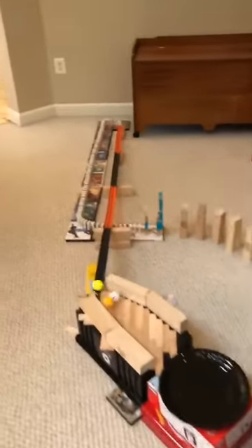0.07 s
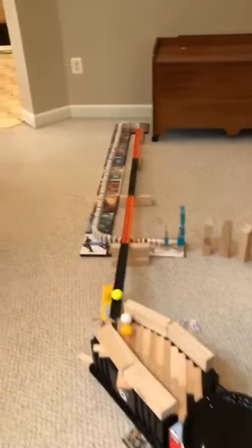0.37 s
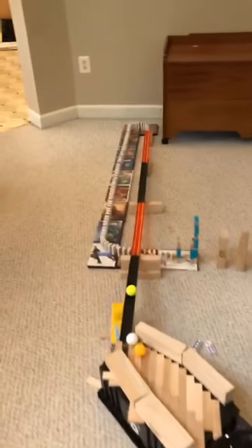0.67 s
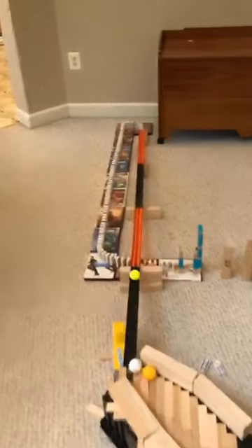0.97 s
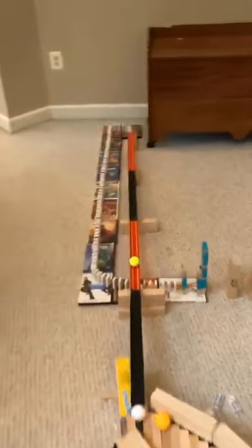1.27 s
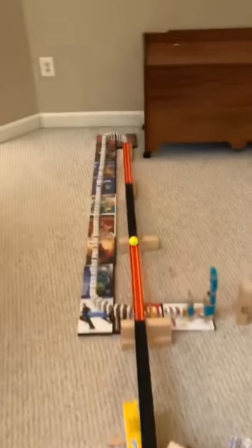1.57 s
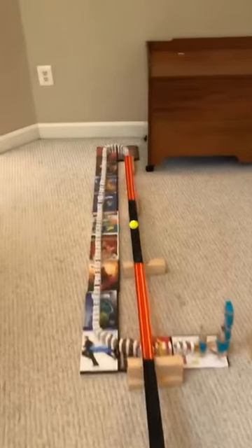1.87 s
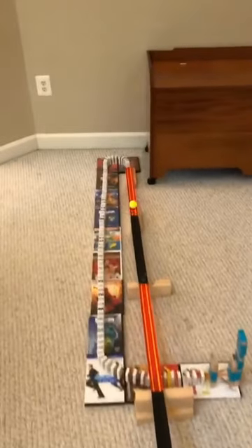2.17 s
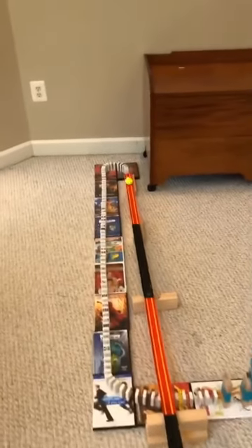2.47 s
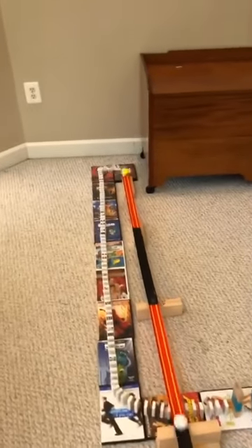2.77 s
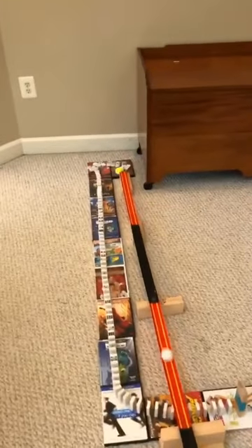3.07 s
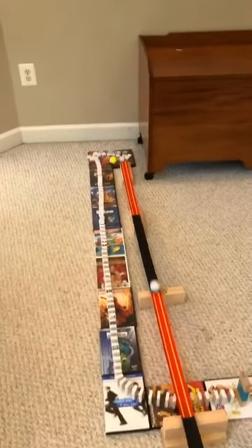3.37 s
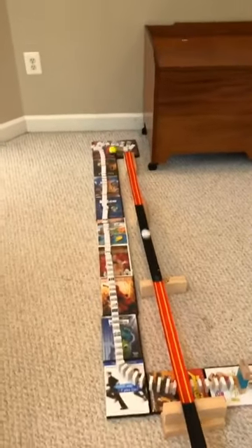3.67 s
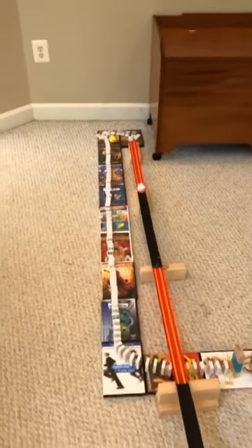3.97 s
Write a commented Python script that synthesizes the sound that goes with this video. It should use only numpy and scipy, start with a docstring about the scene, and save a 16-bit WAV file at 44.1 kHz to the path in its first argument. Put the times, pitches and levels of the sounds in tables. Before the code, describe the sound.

A row of dominoes topples after a short lead-in, in a carpeted room. Wooden levers knock several times in the first 0.3 seconds. From about 0.5 seconds a small ball rolls quietly along a plastic track, ticking over joints and growing slightly louder. At 2.7 seconds it clicks into the dominoes, which fall in a loud, dense, bright clatter with light hollow thuds, continuing to the end at about 4 seconds.

```python
"""Wooden levers knock in a carpeted room and release a ball, which rolls away down a plastic marble run,
ticking over bumps and joints. It strikes a long row of dominoes, which topple in a dense, bright clatter:
each tile rings briefly as it hits the next and thuds on the hollow cases beneath."""
import sys
import numpy as np
from scipy import signal
from scipy.fft import rfft, irfft
from scipy.io import wavfile
from scipy.ndimage import uniform_filter1d

SR = 44100
rng = np.random.default_rng(int(sys.argv[2]) if len(sys.argv) > 2 else 0)


def dump(signal):
    """Clip the signal to [-1, 1] and save it as 16-bit WAV at the path in sys.argv[1]."""
    limited = np.clip(np.atleast_2d(signal).T, -1, 1)
    pcm = np.round(limited * 32767).astype(np.int16)
    wavfile.write(sys.argv[1], SR, pcm)


N = 176400
TIME = np.arange(N) / SR

# Level rides of the toppling row: time_s, tile_ring_db, contact_crack_db, case_thud_db
TOPPLE = [(2.696, -16, -33, -62), (2.745, -9, -31, -40.5), (2.785, -19, -27.5, -39.5),
          (2.825, -23, -36.5, -42), (2.935, -24.5, -31.5, -34), (2.99, -17, -33, -44.5),
          (3.09, -18.5, -29.5, -39.5), (3.19, -14.5, -38.5, -46.5), (3.245, -26, -29.5, -44.5),
          (3.39, -17, -31, -41), (3.52, -22, -27, -40), (3.6, -20, -31.5, -41), (3.81, -24, -27.5, -38.5),
          (3.93, -16.5, -26.5, -40.5)]
# Bright EQ of tile cracking on tile: frequency_hz, gain_db
CRACK_EQ = [(100, -48), (2000, -9.5), (3400, 1.5), (5800, 5), (7000, 10.5), (9700, 1), (11000, -3),
            (13000, -23.5)]

TOPPLE_START_S = TOPPLE[0][0]
TILE_PITCH_SPREAD, BUMPS_PER_S = 0.024, 2400


def amp(db):
    """Decibels to gain."""
    return 10 ** (np.asarray(db) / 20)


def unit(x):
    """Scale to rms 1."""
    return x / np.sqrt(np.mean(x ** 2))


def ride(rows, column):
    """Gain over time from one dB column of a table."""
    rows = np.array(rows)
    return amp(np.interp(TIME, rows[:, 0], rows[:, column]))


def add(out, start_s, sound):
    """Mix a sound in at its start time."""
    i = min(max(int(start_s * SR), 0), N)
    out[i:i + len(sound)] += sound[:N - i]


def fade(t60, size):
    """Exponential decay, 60 dB down after t60 seconds."""
    return np.exp(-np.log(1000) * np.arange(size) / SR / t60)


def burst(t60, size=4096):
    """Decaying noise of unit energy."""
    x = rng.standard_normal(size) * fade(t60, size)
    return x / np.linalg.norm(x)


def ping(hz, t60, size=4096):
    """One decaying mode of unit energy."""
    x = np.sin(2 * np.pi * hz * TIME[:size]) * fade(t60, size)
    return x / np.linalg.norm(x)


def patter(per_s, spread_db):
    """Random tiny impacts, their strengths scattered by spread_db; rms 1."""
    strength = amp(spread_db * np.clip(rng.standard_normal(N), -2, 2))
    return unit((rng.random(N) < per_s / SR) * strength * rng.choice([-1, 1], N))


def drift(per_s):
    """Smooth random wander, rms 1."""
    step = int(SR / per_s)
    return unit(uniform_filter1d(rng.standard_normal(N)[np.arange(N) // step], step))


def colour(x, eq, size=4096):
    """Minimum-phase EQ of unit energy through (frequency_hz, gain_db) points."""
    hz, db = np.array(eq).T
    log_hz = np.log(np.fft.rfftfreq(size, 1 / SR) + 1)
    cepstrum = irfft(np.log(amp(np.interp(log_hz, np.log(hz), db))))
    cepstrum[1:size // 2] *= 2
    cepstrum[size // 2 + 1:] = 0
    impulse = irfft(np.exp(rfft(cepstrum)))
    return signal.fftconvolve(x, impulse / np.linalg.norm(impulse))[:N]


def room(x, wet_db, predelay_s=0.0043, size=32768):
    """Carpeted room: the direct sound plus a diffuse tail whose treble dies first."""
    noise = rng.standard_normal(size)
    low = signal.sosfilt(signal.butter(1, 2500, fs=SR, output="sos"), noise)
    tail = low * fade(t60=0.8, size=size) + (noise - low) * fade(t60=0.37, size=size)
    tail *= TIME[:size] > predelay_s
    return x + amp(wet_db) * signal.fftconvolve(x, tail / np.linalg.norm(tail))[:N]


def levers():
    """Wooden levers tick, thump and ring their frame, with a scrape that dies away."""
    # Lever knocks: start_s, thump_db, tick_db, pitch_hz
    knocks = [(.001, -9.5, -26, 1300), (.089, -20, -20, 850), (0.1096, -7, -4, 1650), (.16, -29, -12, 3430),
              (.174, -20, -18, 3500), (0.2077, -21, -6.5, 9930), (.226, -8.5, -15.5, 790),
              (0.249, -25, -17.5, 8500)]
    # Hollow modes of the frame: pitch_hz, level_db, t60_s
    frame_modes = [(183, -37, 0.39), (234, -26.5, 0.13), (311, -29.5, 0.27)]
    # EQs of the wood's body, attack and scrape: frequency_hz, gain_db
    thump_eq = [(62, -40), (135, -12), (215, 5), (460, -2), (900, -6), (1800, -21), (4000, -21),
                (12000, -38)]
    tick_eq = [(100, -27), (1200, 7), (2100, 5), (2800, -1), (3450, 2.5), (4800, -6.5), (7000, -6.5),
               (8400, 3), (13000, -6)]
    scrape_eq = [(60, -35), (200, 7.5), (1200, -3), (4000, -16.5), (12000, -27.5)]
    thump, tick, ring = np.zeros((3, N))
    frame = sum(amp(db) * np.sin(2 * np.pi * hz * TIME) * fade(t60, N) for hz, db, t60 in frame_modes)
    for start_s, thump_db, tick_db, hz in knocks:
        add(thump, start_s, amp(thump_db) * burst(t60=0.034))
        add(ring, start_s, amp(thump_db) * frame)
        add(ring, start_s, amp(tick_db - 4.5) * ping(hz, t60=0.0084))
        add(tick, start_s, amp(tick_db) * burst(t60=0.012))
    scrape = patter(BUMPS_PER_S, spread_db=3.5) * amp(-36.5 - 55.5 * TIME)
    wood = colour(thump, thump_eq) + colour(tick, tick_eq) + colour(scrape, scrape_eq)
    return room(wood, wet_db=-7) + room(ring, wet_db=-9.5)


def room_tone():
    """A faint, steady bed of bass-heavy air."""
    # EQ of the room's air: frequency_hz, gain_db
    air_eq = [(38, -23), (52, 9.5), (120, -5), (300, -13.5), (2000, -22.5), (13000, -35)]
    return amp(-65.5) * colour(rng.standard_normal(N), air_eq)


def rolling_ball():
    """The ball patters over the grain of the plastic track, ticks at its joints and rubs its rails."""
    # Level rides of the roll: time_s, hiss_db, rattle_db, rumble_db
    roll = [(.4, -74.5, -73, -63.5), (.7, -70, -69.5, -59.5), (.98, -61.5, -65.5, -57.5),
            (1.14, -62, -64.5, -53), (1.25, -60.5, -64, -56), (1.52, -58, -60.5, -54.5),
            (1.68, -58.5, -57.5, -55), (1.79, -59, -61, -62), (1.95, -56.5, -58, -59.5),
            (2.34, -53.5, -56, -62.5), (2.53, -60.5, -61, -66), (2.67, -52.5, -60, -65.5)]
    # Bumps and joints in the track: start_s, level_db, pitch_hz
    joints = [(.868, -36, 3230), (1.014, -38.5, 4600), (1.08, -34, 4880), (1.298, -35.5, 3220),
              (1.338, -32.5, 1410), (1.483, -36, 4670), (1.702, -35.5, 3100), (1.832, -34, 3500),
              (1.914, -36, 5600), (2.232, -33.5, 2370), (2.4046, -30.5, 4800), (2.593, -30.5, 3320),
              (2.651, -33, 3440), (2.663, -29.5, 3450)]
    # EQs of the hiss, hollow on the near track and more even on the far: frequency_hz, gain_db
    near_eq = [(2150, -19), (2450, 4), (2850, 0), (5100, 0), (8500, -10), (13000, -27)]
    far_eq = [(1500, -9.5), (2300, 3), (5000, -1.5), (8500, -7.5), (13000, -24)]
    # EQs of the track's hollow rattle and low rumble: frequency_hz, gain_db
    rattle_eq = [(250, -8.5), (1100, 4), (3000, -6), (8000, -24.5)]
    rumble_eq = [(70, -17), (150, -6), (215, -6), (255, 4), (295, 1), (350, -14), (600, -15), (1500, -42)]
    tick, thump, ring = np.zeros((3, N))
    rubs = rail_rubs()
    lowest_hz = min(hz for _, _, hz in joints)  # low-pitched joints thump most
    for start_s, db, hz in joints:
        add(ring, start_s, amp(db) * ping(hz, t60=0.0054))
        add(tick, start_s, amp(db + 12) * burst(t60=0.011))
        add(thump, start_s, amp(db + 17) * (lowest_hz / hz) ** 2 * burst(t60=0.063))
    wobble = amp(1.9 * drift(per_s=30))
    grain = patter(BUMPS_PER_S, spread_db=9.5) * wobble * ride(roll, column=1) * amp(1) + tick
    far = TIME > 1.78
    hiss = colour(grain * ~far, near_eq) + colour(grain * far, far_eq)
    rattle = patter(BUMPS_PER_S, spread_db=5) * wobble * ride(roll, column=2)
    rumble = patter(BUMPS_PER_S, spread_db=0) * ride(roll, column=3) * amp(1.5)
    body = colour(rattle + thump, rattle_eq) + colour(rumble + thump, rumble_eq)
    return room(hiss + ring + rubs + body, wet_db=-8.5)


def rail_rubs():
    """The ball rubs the rails in short swells of gritty, resonant friction."""
    # Rubs: centre_s, length_s, pitch_hz, level_db
    rubs = [(1.156, 0.19, 5050, -58), (1.613, 0.18, 4630, -55), (2.303, 0.13, 4150, -53)]
    out = np.zeros(N)
    for centre_s, length_s, hz, db in rubs:
        swell = np.cos(np.pi * np.clip((TIME - centre_s) / length_s, -.5, .5))
        grit = patter(BUMPS_PER_S, spread_db=17)
        out += amp(db) * swell * unit(signal.lfilter(*signal.iirpeak(hz, Q=8.4, fs=SR), grit))
    return out


def ball_strike():
    """The ball meets the first domino with a quick double click."""
    # Contacts: start_s, level_db
    hits = [(2.688, -8), (2.6908, -5.5)]
    # EQ of ball on tile: frequency_hz, gain_db
    strike_eq = [(200, -13), (1200, -5.5), (3800, 3), (5500, -8), (9000, 2), (13000, -30)]
    clicks = np.zeros(N)
    for start_s, db in hits:
        add(clicks, start_s, amp(db) * burst(t60=0.0091))
    return colour(clicks, strike_eq)


def tile_ring(hz, contact_s=0.00018, size=1024):
    """One struck domino rings briefly; the contact time rounds its attack."""
    # Tile modes, the main ring, then a fainter lower and a fainter higher one: pitch_ratio, level_db, t60_s
    modes = [(0.997, -0.5, 0.014), (.82, -16, 0.017), (1.1, -11, 0.02)]
    t = TIME[:size]
    attack = 1 - np.exp(-(t / contact_s) ** 2)
    ring = sum(amp(db) * fade(t60, size) * np.sin(2 * np.pi * hz * ratio * t) for ratio, db, t60 in modes)
    return attack * ring / amp(modes[0][1])


def hard_clacks(rebound_s=0.0014, rebound_db=-2.5):
    """The hardest domino collisions: a crack, a ring and two quick, weaker rebounds."""
    # Collisions: start_s, level_db, pitch_hz
    clacks = [(2.6955, -1.5, 9090), (2.7068, -10, 9300), (2.718, -4, 8760), (2.746, 1.5, 8800),
              (2.8599, -7.5, 8400), (2.913, -7, 8600), (2.9545, 0, 8680), (2.986, -3, 8430),
              (3.1006, -7, 8500), (3.1436, -6, 8400), (3.186, -3, 8500), (3.2203, -3, 8200),
              (3.2237, -1, 8850), (3.2702, -3, 8800), (3.279, -6.5, 8700), (3.303, -13, 8750),
              (3.3042, -3.5, 8470), (3.371, -6.5, 8250), (3.496, -8, 8800), (3.5888, -2.5, 8200),
              (3.632, -7, 8540), (3.714, -4.5, 8900), (3.744, -6.5, 8240), (3.7894, -7, 8500),
              (3.8159, -10, 8600)]
    ring, crack = np.zeros((2, N))
    for start_s, db, hz in clacks:
        approach_db = 3.5 * (start_s - TOPPLE_START_S)  # cracks grow as the toppling front comes nearer
        add(crack, start_s, amp(db - 0.5 + approach_db) * burst(t60=0.008))
        for k, (jitter, detune) in enumerate(rng.uniform(-0.7, 1, size=(3, 2))):
            contact = amp(db - 2.5 + k * rebound_db) * tile_ring(hz * (1 + TILE_PITCH_SPREAD * detune))
            add(ring, start_s + rebound_s * k * (1 + jitter / 10), contact)
    return room(ring + colour(crack, CRACK_EQ), wet_db=-6)


def tile_low_ring(start_s, detune, main_ring):
    """A tile's low mode, which varies along the row, scaled to its main ring."""
    # Low mode along the row: time_s, pitch_hz, relative_db
    low_mode = [(2.8, 6140, -16), (3.03, 4770, -15.5), (3.25, 4770, -16), (3.4, 4930, -17.5)]
    times, pitches, levels = np.array(low_mode).T
    hz = np.interp(start_s, times, pitches) * (1 + 0.086 * detune)
    gain = np.linalg.norm(main_ring) * amp(np.interp(start_s, times, levels))
    return gain * ping(hz, t60=0.013, size=len(main_ring))


def clatter(hits_per_s=620, first_hz=8810, settled_hz=8545, settle_s=0.25):
    """Hundreds of light tile collisions ring and crack in clumps, their pitch settling slightly."""
    ring, crack = np.zeros((2, N))
    wander = 1 + 0.016 * drift(per_s=50)
    count = int(hits_per_s * (N / SR - TOPPLE_START_S))
    for k, (jitter, force, detune, edge, low_detune) in enumerate(rng.standard_normal((count, 5))):
        age_s = abs(k + jitter) / hits_per_s
        start_s = TOPPLE_START_S + age_s
        hz = settled_hz + (first_hz - settled_hz) * np.exp(-age_s / settle_s)
        main_ring = tile_ring(hz * wander[int(age_s * SR)] * (1 + TILE_PITCH_SPREAD * detune))
        strength = amp(min(force, 1.3)) * np.sign(edge)
        add(ring, start_s, strength * (main_ring + tile_low_ring(start_s, low_detune, main_ring)))
        add(crack, start_s, np.array([strength * (.5 + abs(edge))]))
    ring = unit(ring) * ride(TOPPLE, column=1) * amp(-2)
    crack = colour(unit(crack) * ride(TOPPLE, column=2), CRACK_EQ) * amp(-0.5)
    clumps = unit(amp(2.5 * np.minimum(drift(per_s=70), 1)))
    active_share = 1 - TOPPLE_START_S * SR / N  # sets the rms over the toppling alone
    return room(np.sqrt(active_share) * clumps * (ring + crack), wet_db=-6)


def case_thuds(hits_per_s=260):
    """Falling tiles thud and slap on the hollow cases, each case at its own pitch."""
    # EQ of the cases' body: frequency_hz, gain_db
    case_eq = [(62, -10), (118, -9), (180, 4), (1380, 0), (5000, -25)]
    # Centre pitch of the case under the falling tiles: time_s, pitch_hz
    case_pitch = [(2.87, 772), (3.15, 426), (3.42, 480), (3.6, 670)]
    level = ride(TOPPLE, column=3)
    impacts = patter(hits_per_s, spread_db=3.5) * (TIME > TOPPLE_START_S)
    thuds = colour(impacts * level, case_eq) * amp(-5.5)
    slaps = np.zeros(N)
    count = int(hits_per_s * (N / SR - TOPPLE_START_S))
    for k, (jitter, force, detune) in enumerate(rng.standard_normal((count, 3))):
        start_s = TOPPLE_START_S + abs(k + jitter) / hits_per_s
        hz = np.interp(start_s, *np.array(case_pitch).T) * np.exp(0.358 * detune)
        add(slaps, start_s, force * ping(hz, t60=0.03))
    return room(thuds + slaps * level * amp(18), wet_db=-3)


def scene():
    """Levers, ball and dominoes over the room tone, in mono."""
    dominoes = room(ball_strike(), wet_db=-6) + hard_clacks() + clatter() + case_thuds()
    return (levers() + room_tone() + rolling_ball() + dominoes)[None]


def record(dry, low_cut_hz=47, ceiling=.88, high_cut_hz=13300):
    """Thin the deep bass, round the highest peaks and cut the top."""
    thin = signal.sosfilt(signal.butter(3, low_cut_hz, "high", fs=SR, output="sos"), dry)
    oversampled = signal.resample_poly(thin, 2, 1, axis=1)
    rounded = oversampled / (1 + (oversampled / ceiling) ** 4) ** .25
    soft = signal.resample_poly(rounded, 1, 2, axis=1)
    return signal.sosfilt(signal.ellip(8, .2, 70, high_cut_hz, fs=SR, output="sos"), soft)


dry = scene()
out = record(dry)
dump(out)
```